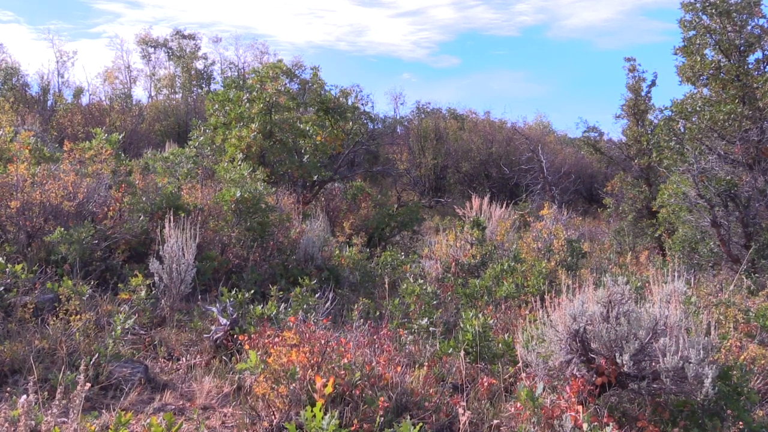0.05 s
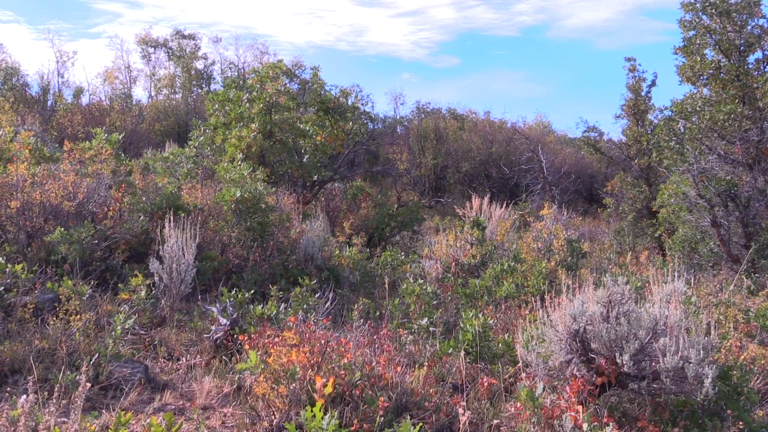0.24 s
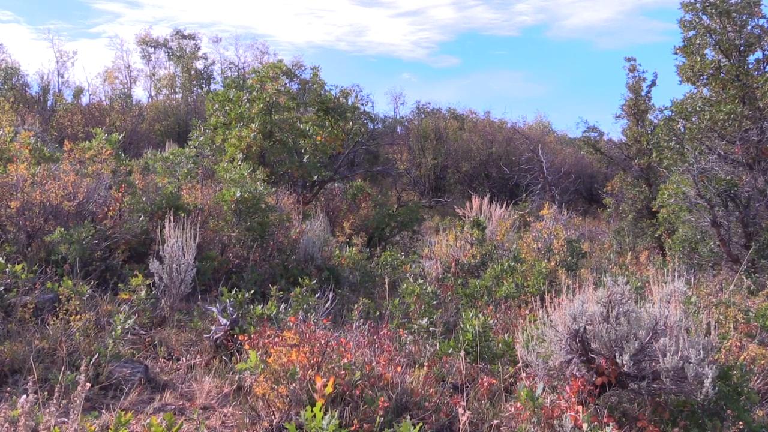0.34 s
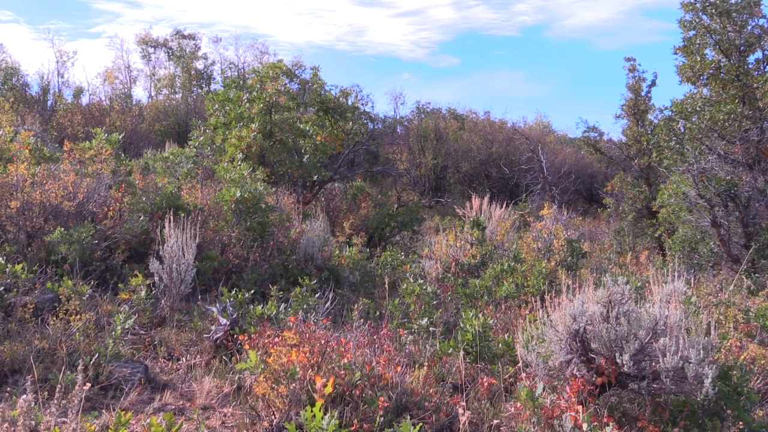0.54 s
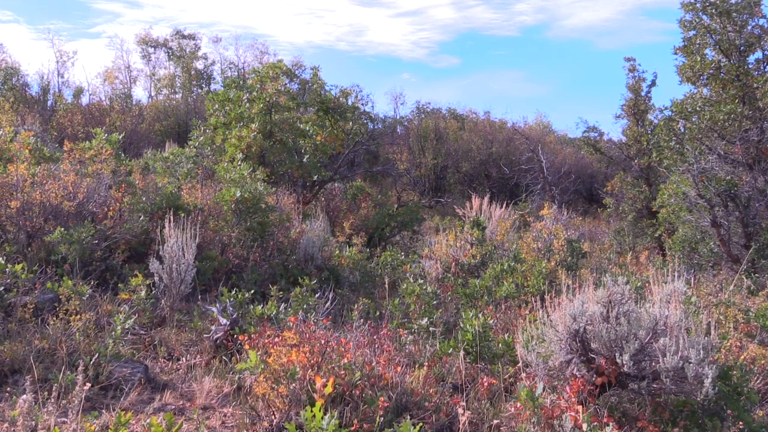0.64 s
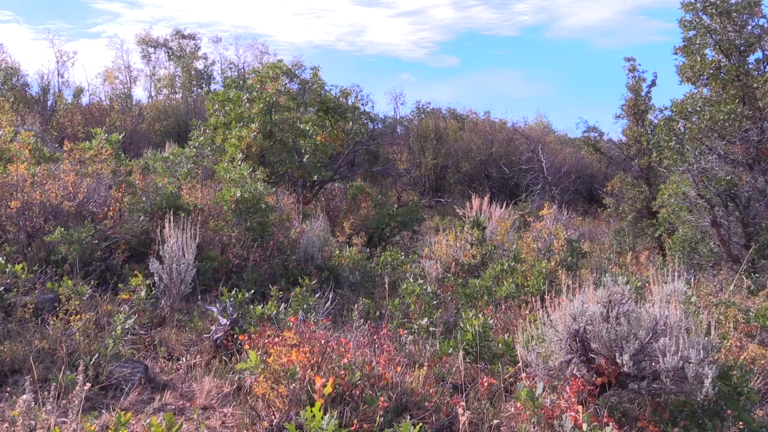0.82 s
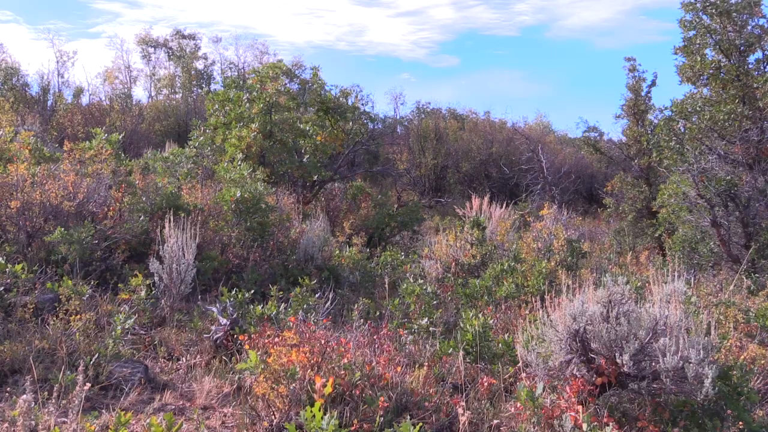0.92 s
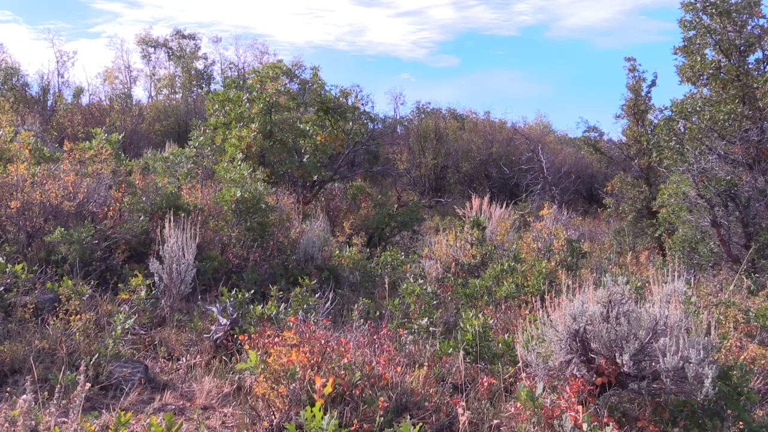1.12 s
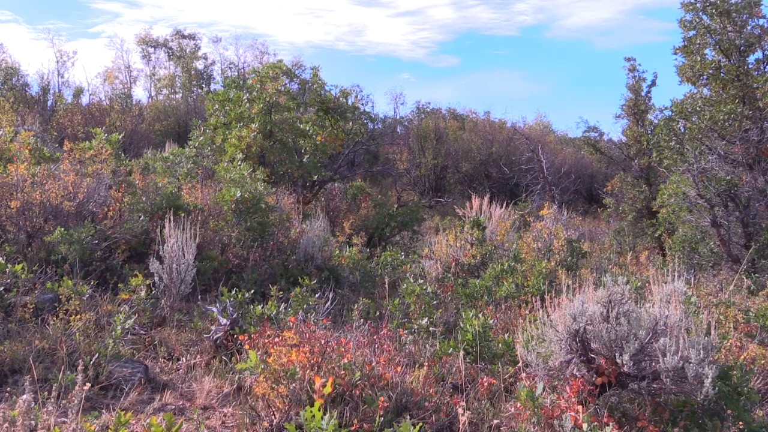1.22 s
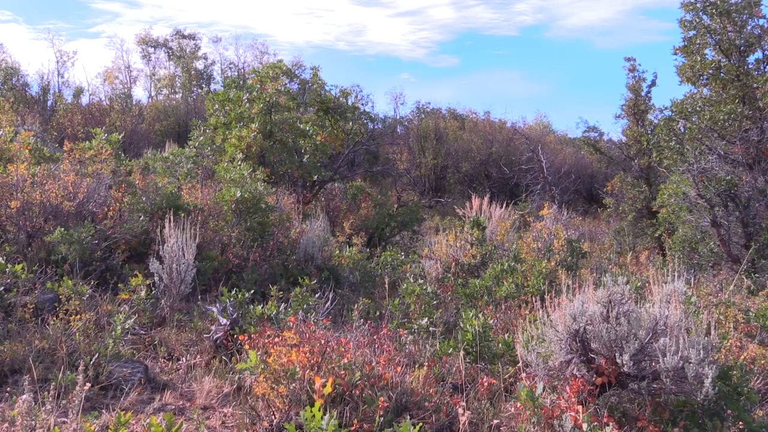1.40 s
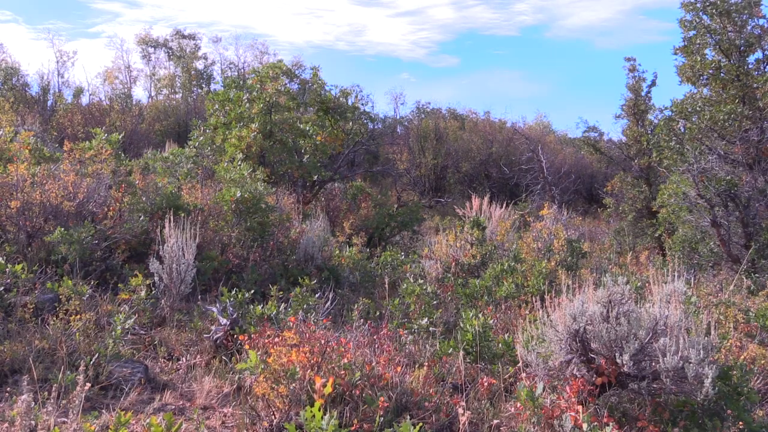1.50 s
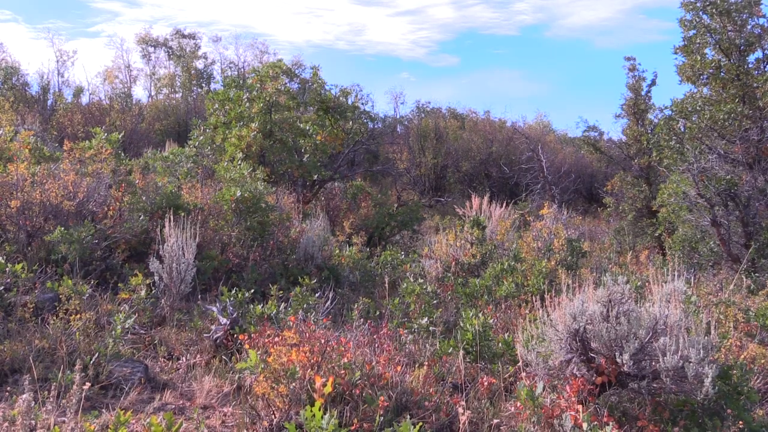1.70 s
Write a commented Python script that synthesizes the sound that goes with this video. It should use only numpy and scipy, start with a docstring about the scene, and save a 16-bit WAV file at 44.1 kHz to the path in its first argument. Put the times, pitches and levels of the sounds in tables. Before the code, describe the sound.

An elk gives a shrill whistle that breaks into a falling yelp. Two shorter yelps and a soft grunt follow, with hoarse panting between. The call echoes faintly from a distance across a quiet, brushy hillside.

```python
"""An elk's two-voiced whistle breaks into a falling yelp on a quiet, brushy hillside. Two shorter yelps
and a soft grunt follow, with hoarse panting between them. The whistle's voices mix into overtones;
yelps, laryngeal pulses and turbulent breath ring the long throat. Brush scatters the call, slopes
echo it, and a few twigs tick over a soft hiss of air."""
import sys
import numpy as np
from scipy import signal
from scipy.fft import rfft, irfft
from scipy.io import wavfile

SR = 44100
rng = np.random.default_rng(int(sys.argv[2]) if len(sys.argv) > 2 else 0)


def store_pcm(level_fs):
    """Save levels as 16-bit WAV."""
    pcm = np.round(np.clip(level_fs, -1, 1) * 32767).astype(np.int16)
    wavfile.write(sys.argv[1], SR, np.atleast_2d(pcm).T)


N = 77175
TIME = np.arange(N) / SR
THROAT_PAN_DB, TWIG_PAN_DB = -2.2, -6.5
TONE_JITTER_HZ, GROWL_JITTER_HZ = 350, 110   # bandwidths of the pitch wobble
THROAT_LOW_HZ = 490   # low edge of rasp and creaks


def from_db(db):
    """Decibels to gain."""
    return 10 ** (np.asarray(db) / 20)


def unit_rms(x):
    """Scale to rms 1."""
    return x / np.sqrt(np.mean(x ** 2) + 1e-20)


def gated_curves(rows):
    """A gate with 2 ms edges over the rows' time span, then each further column interpolated."""
    times_s, *columns = np.transpose(rows)
    gate = np.clip(np.minimum(TIME - times_s[0], times_s[-1] - TIME) / .002 + .5, 0, 1)
    return [gate] + [np.interp(TIME, times_s, column) for column in columns]


def band(x, hz, kind, order=2):
    """Butterworth filter."""
    return signal.sosfilt(signal.butter(order, hz, kind, fs=SR, output="sos"), x + 1e-18)


def wobble(bandwidth_hz):
    """Smooth random motion, rms 1."""
    return unit_rms(band(rng.standard_normal(N), bandwidth_hz, "low"))


def jittered_phase(hz, jitter, bandwidth_hz):
    """Phase in radians of a pitch that wobbles by the fraction jitter."""
    return 2 * np.pi * np.cumsum(hz * (1 + jitter * wobble(bandwidth_hz))) / SR


def pan(x, db):
    """Mono to stereo, left minus right in dB."""
    return x * from_db([[db / 2], [-db / 2]])


def delayed(x, delay_s):
    """Fractional delay."""
    return np.interp(TIME - delay_s, TIME, x, left=0)


def decay(start_s, db, t60_s):
    """Envelope: instant onset, exponential fall."""
    return (TIME >= start_s) * from_db(db - 60 * np.maximum(TIME - start_s, 0) / t60_s)


def open_air(level_db=-50.5):
    """Steady hiss of the hillside, independent at each ear."""
    # Air spectrum. Each row: frequency in Hz, relative density in dB.
    spectrum = [(25, -14), (60, -16.5), (120, -14.5), (220, -16.5), (600, -11), (1000, -2), (1600, -1),
                (4000, -12), (8000, -16.5), (15500, -28)]
    hz, db = np.transpose(spectrum)
    bin_hz = np.arange(N // 2 + 1) * SR / N
    gain = from_db(np.interp(np.log(bin_hz + 1), np.log(hz), db))
    return from_db(level_db) * unit_rms(irfft(gain * rfft(rng.standard_normal((2, N))), N))


def thud(start_s=.857, db=-49, hz=333, t60_s=.045):
    """A faint, dull bump."""
    return pan(decay(start_s, db, t60_s) * np.sin(2 * np.pi * hz * (TIME - start_s)), TWIG_PAN_DB)


def twigs():
    """Each tick is a short crack and a brief ring of dry wood."""
    # Ticks. Each row: start in seconds, level in dB, pitch as a ratio to the modes.
    ticks = [(.792, -44, 0.79), (0.797, -50, 1.9), (1.262, -48, 1), (1.2999, -35.5, 0.97),
             (1.329, -42.5, 0.81), (1.3357, -37.5, .66), (1.488, -44.5, 0.8)]
    # Wood modes. Each row: frequency in Hz, gain in dB.
    modes = [(1000, -15.5), (2080, 0.5), (3120, -4)]
    cracks = rings = 0
    for start_s, db, ratio in ticks:
        cracks += decay(start_s, db + 1.5, t60_s=.0075) * rng.standard_normal(N)
        for hz, mode_db in modes:
            ring = np.sin(2 * np.pi * hz * ratio * (TIME - start_s))
            rings += decay(start_s, db + mode_db, t60_s=.022) * ring
    return pan(band(cracks, [700, 4500], "band") + rings, TWIG_PAN_DB)


def far_echoes(shrill):
    """The whistle's held notes return from far slopes."""
    # Echoes. Each row: delay in seconds, gain in dB, left minus right in dB.
    returns = [(.105, -21, -15.5), (.205, -33.5, -9), (.44, -33.5, -16.5), (.545, -34, -15)]
    held_notes = band(shrill.mean(axis=0), [1965, 2330], "band", order=5)
    return sum(pan(from_db(db) * delayed(held_notes, delay_s), pan_db) for delay_s, db, pan_db in returns)


def scatter(x, gain_db, t60_s, delay_s):
    """A dying cloud of reflections, different at each ear."""
    cloud = rng.standard_normal((2, N)) * (TIME > delay_s) * from_db(-60 * TIME / t60_s)
    cloud /= np.sqrt(np.sum(cloud ** 2, axis=1, keepdims=True))
    return from_db(gain_db) * signal.fftconvolve(x, cloud, axes=1)[:, :N]


def throat(x):
    """Parallel resonances of the long throat, signs alternating."""
    # Resonances. Each row: centre in Hz, width in Hz, gain in dB.
    resonances = [(368, 83, -22.5), (568, 41, -9), (714.7, 79.5, -6.5), (1018.7, 89, 0.5),
                  (1408, 62.4, -1.5), (1907, 210, -5.5), (2510, 180, -9), (3390, 620, -14.5)]
    out = 0
    for k, (hz, width_hz, db) in enumerate(resonances):
        radius = np.exp(-np.pi * width_hz / SR)
        feedback = [1, -2 * radius * np.cos(2 * np.pi * hz / SR), radius ** 2]
        ringing = (1 - radius ** 2) / 2 * signal.lfilter([1, 0, -1], feedback, x + 1e-18)
        out += (-1) ** k * from_db(db) * ringing
    return out


def creaks(pitch_rise=.11, top_hz=1613):
    """Short runs of uneven laryngeal pulses, rising slightly in pitch, ring the throat."""
    # Growls. Each row: start in seconds, length in seconds, level in dB, pitch in Hz, jitter fraction.
    growls = [(.255, .12, -46, 338, .012), (.325, .09, -37, 368, .025), (0.636, 0.017, -34, 332, 0.13),
              (0.663, 0.058, -33.5, 347, 0.025), (1.188, .046, -33.5, 337, 0.035)]
    out = 0
    for start_s, length_s, db, hz, jitter in growls:
        progress = np.clip((TIME - start_s) / length_s, 0, 1)
        pulse_hz = hz * np.exp(pitch_rise * (progress - .5) + jitter * wobble(GROWL_JITTER_HZ))
        pulses = np.diff(np.floor(np.cumsum(pulse_hz) / SR), prepend=0)
        swell = np.sqrt(np.abs(np.sin(np.pi * progress)))
        ringing = band(throat(pulses), [THROAT_LOW_HZ, top_hz], "band", order=3)
        out += from_db(db) * swell * unit_rms(ringing)
    return out


def rasp(flutter_db=2, sway=.03, split_hz=1946, top_hz=3460):
    """Fluttering turbulence in the throat, whose resonances sway as the elk calls and pants."""
    # One curve per call or pant. Each row: time in seconds, body level in dB, treble level in dB.
    breaths = [
        [(.25, -62.5, -69.5), (.378, -39.5, -33.5), (.41, -26.5, -34.5), (.44, -34, -39.5), (.49, -48.5, -60)],
        [(.5, -48.5, -69), (.6, -42, -48), (.705, -40, -53), (.76, -77, -86)],
        [(.915, -51, -39), (.935, -32.5, -57.5), (.955, -38, -42.5), (.98, -35, -47.5), (1.03, -61, -68)],
        [(1.05, -55, -58), (1.115, -44, -59.5), (1.175, -44.5, -57), (1.215, -46.5, -67), (1.27, -57, -72)],
        [(1.49, -54.5, -61), (1.58, -43.5, -66), (1.67, -48.5, -64), (1.69, -44, -67)],
    ]
    air = throat(rng.standard_normal(N) * from_db(flutter_db * wobble(bandwidth_hz=81)))
    swayed_s = np.cumsum(1 + sway * wobble(bandwidth_hz=20)) / SR
    air = np.interp(swayed_s, TIME, air, period=N / SR)
    body = unit_rms(band(air, [THROAT_LOW_HZ, split_hz], "band", order=3))
    treble = unit_rms(band(band(air, split_hz, "high", order=4), top_hz, "low", order=8))
    return sum(gate * (from_db(body_db) * body + from_db(treble_db) * treble)
               for gate, body_db, treble_db in map(gated_curves, breaths))


def voice(rows, jitter=.003):
    """One pure whistling voice, as a rotating phasor."""
    gate, hz, db = gated_curves(rows)
    return gate * from_db(db) * np.sqrt(2) * np.exp(1j * jittered_phase(hz, jitter, TONE_JITTER_HZ))


def yelps(jitter=.08, chop_hz=380, chop_depth=1.3):
    """A tone plunges through the throat resonances; an uneven growl chops it into rasping partials."""
    # One curve per yelp. Each row: time in seconds, pitch in Hz, larynx level in dB, octave gain in dB.
    glides = [
        [(.372, 1950, -32, 6), (.392, 1680, -16, -5), (.401, 1340, -17, -10), (.411, 1120, -19, -8),
         (.419, 780, -15, -10), (.4235, 620, -12, -5), (.428, 550, -25, -4), (.443, 500, -27, -4)],
        [(.913, 1640, -36, -25), (.918, 1380, -22, -25), (.9245, 1040, -10, -30), (.929, 985, -11, -28),
         (.933, 850, -26, -18), (.937, 950, -13, -24), (.942, 690, -14, -16), (.946, 600, -21, -12),
         (.956, 450, -30, -9)],
        [(1.369, 700, -21, -16), (1.376, 615, -18, -22), (1.38, 520, -25, 2), (1.384, 500, -26, 3),
         (1.397, 300, -40, -6)],
        [(1.681, 800, -35, -10), (1.692, 745, -30, -13), (1.704, 490, -42, -10)],
    ]
    # Roughness per yelp, 0 to 1. Each row: value at the start, value at the end.
    roughness = [(.3, .7), (0, .45), (0, .3), (.4, .4)]
    # Thin overtone in the second yelp. Each row: time in seconds, pitch in Hz, level in dB.
    squeak = [(.926, 3620, -54), (.933, 3450, -37), (.941, 3280, -54)]
    larynx = 0
    for rows, rough_ends in zip(glides, roughness):
        gate, hz, db, octave_db = gated_curves(rows)
        rough = np.interp(TIME, [rows[0][0], rows[-1][0]], rough_ends)
        phase = jittered_phase(hz, jitter * rough, TONE_JITTER_HZ)
        growl = np.sin(jittered_phase(chop_hz, jitter, GROWL_JITTER_HZ))
        chop = np.exp(chop_depth * rough * growl) / np.sqrt(np.i0(2 * chop_depth * rough))   # unit power
        tone = np.sin(phase) + from_db(octave_db) * np.sin(2 * phase)
        larynx += gate * from_db(db) * chop * np.sqrt(2) * tone
    return throat(larynx) + np.real(voice(squeak))


def whistle(saturation=.25, side_db=-9, side_step_db=-10):
    """Two voices sound at once; as they swell they mix into overtones and side tones."""
    # The two voices. Each row: time in seconds, pitch in Hz, level in dB.
    upper_curve = [(.13, 2700, -60), (.16, 2645, -39), (.193, 2610, -32), (.199, 2525, -37),
                   (.208, 2525, -26), (.219, 2495, -28), (.225, 2450, -42), (.234, 2455, -25),
                   (.247, 2435, -25), (.254, 2260, -29), (.285, 2243, -20), (.335, 2232, -19),
                   (.362, 2180, -26), (.385, 2050, -46)]
    lower_curve = [(.2, 1960, -58), (.255, 1981, -34), (.32, 1986, -26), (.345, 1984, -20.5),
                   (.366, 1980, -20), (.378, 1925, -25), (.387, 1900, -22), (.397, 1650, -34)]
    upper, lower = voice(upper_curve), voice(lower_curve)
    high, low = (v / (np.abs(v) + 1e-9) ** saturation for v in (upper, lower))
    # Lower voice's octave, sum tone, upper voice's octave.
    overtones = from_db(-9) * low ** 2 + from_db(-17) * high * low + from_db(-29) * high ** 2
    beat = np.exp(1j * np.angle(upper * np.conj(lower)))
    side_tones = from_db(side_db) * high * np.abs(low) * beat * (1 + from_db(side_step_db) * beat)
    return np.real(pan(upper, db=2.6) + lower + side_tones + pan(overtones, THROAT_PAN_DB))


def scene():
    """The elk, its reflections, the twigs, a thud and the air."""
    shrill = whistle()
    left, right = shrill + pan(yelps() + rasp() + creaks(), THROAT_PAN_DB)
    elk = np.array([delayed(left, delay_s=40e-6), right])
    brush = scatter(elk, gain_db=-10, t60_s=.21, delay_s=.002)
    slope = scatter(elk, gain_db=-26, t60_s=1.2, delay_s=.06)
    return elk + brush + slope + far_echoes(shrill) + twigs() + thud() + open_air()


def record(dry):
    """Steep low-pass at 15750 Hz."""
    return signal.sosfilt(signal.ellip(12, .1, 80, 15750, fs=SR, output="sos"), dry)


dry = scene()
out = record(dry)
store_pcm(out)
```